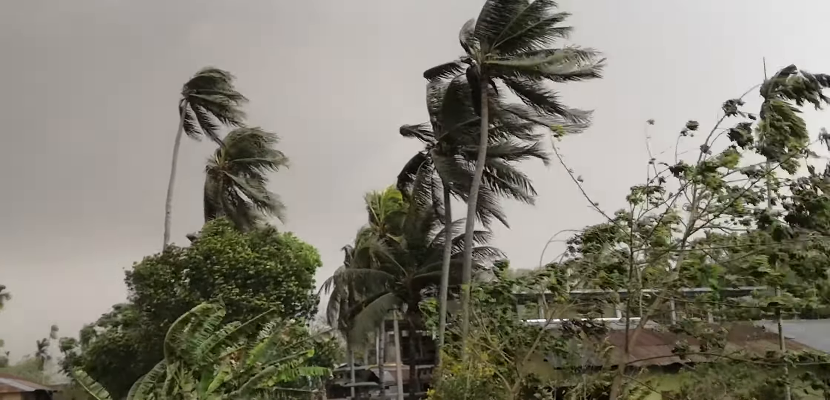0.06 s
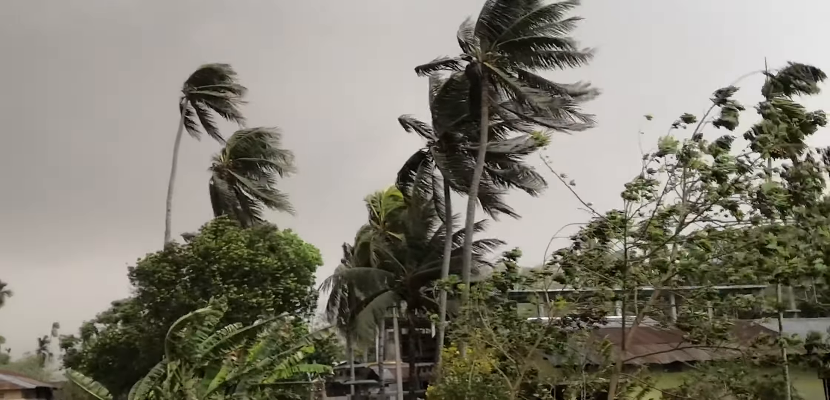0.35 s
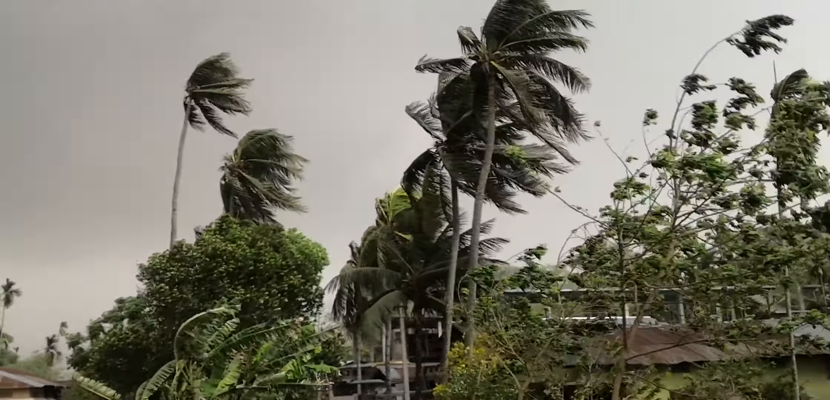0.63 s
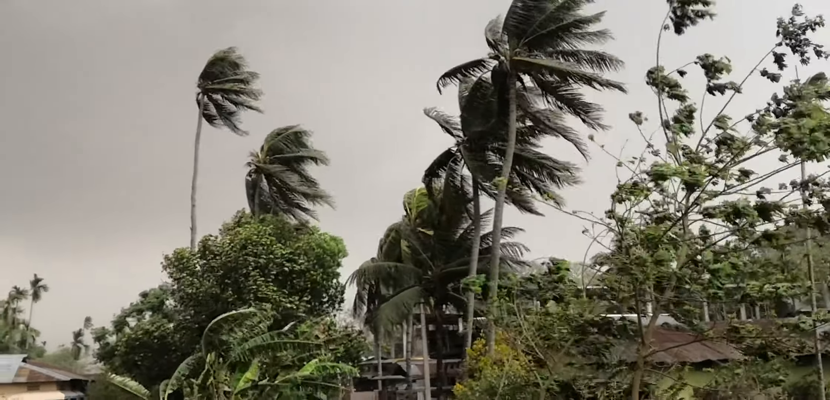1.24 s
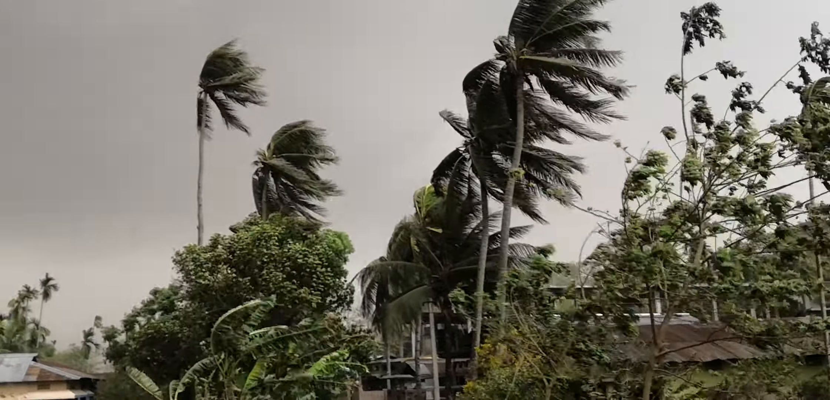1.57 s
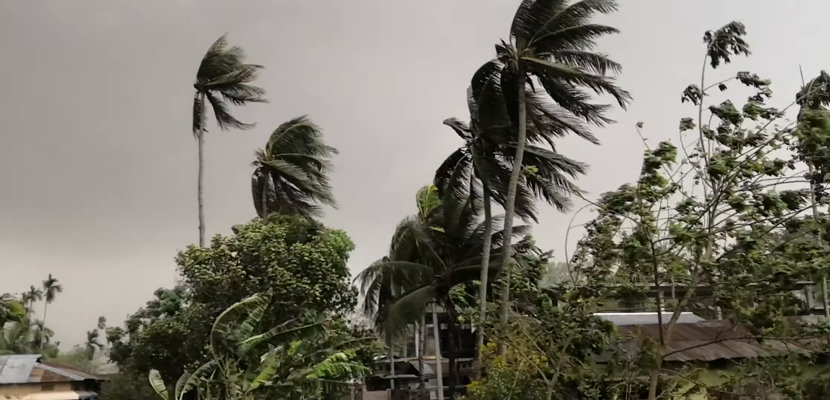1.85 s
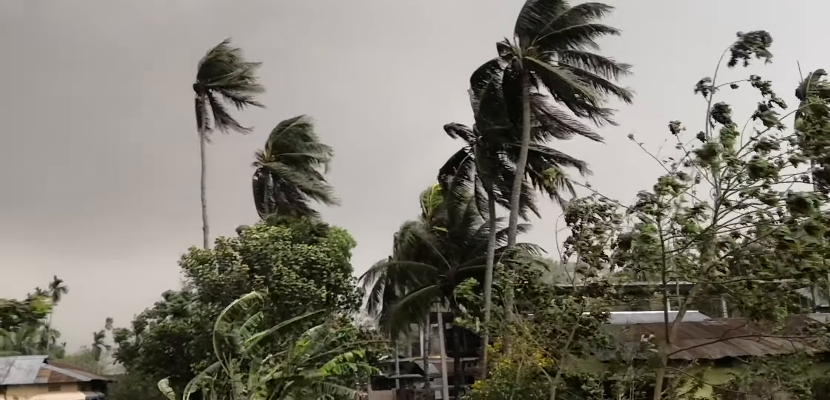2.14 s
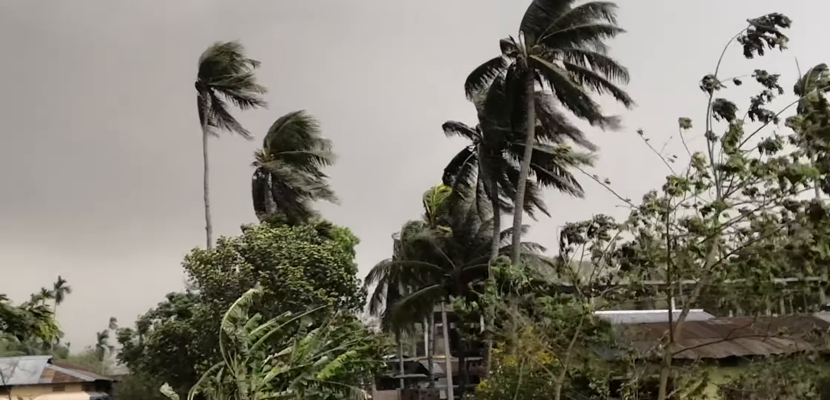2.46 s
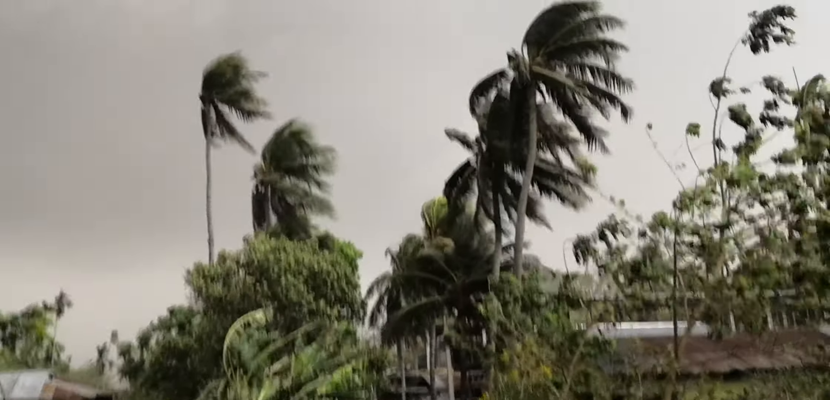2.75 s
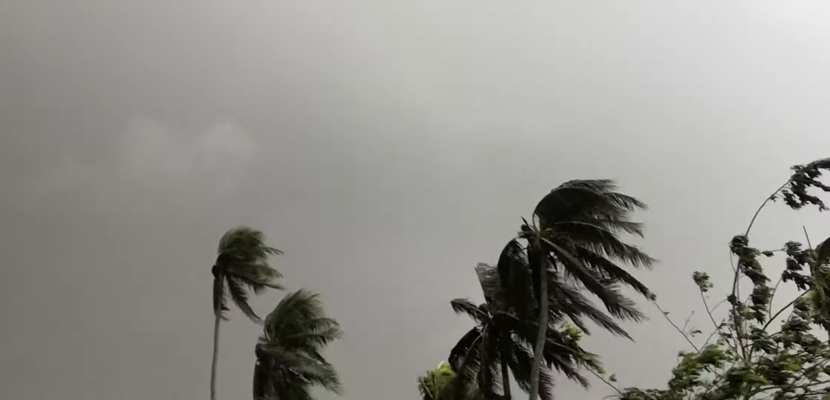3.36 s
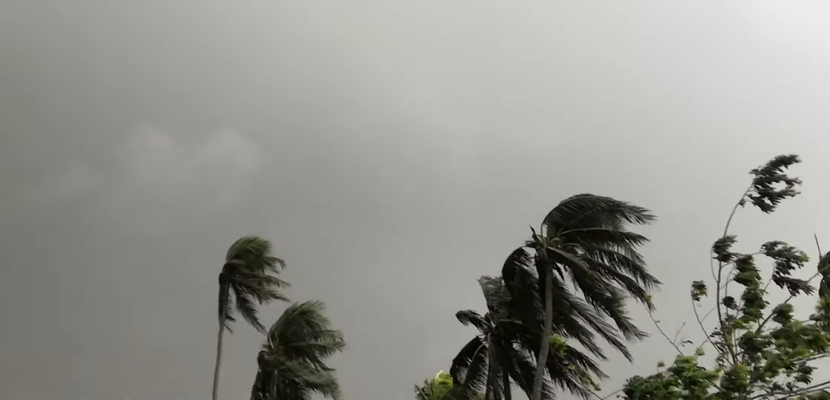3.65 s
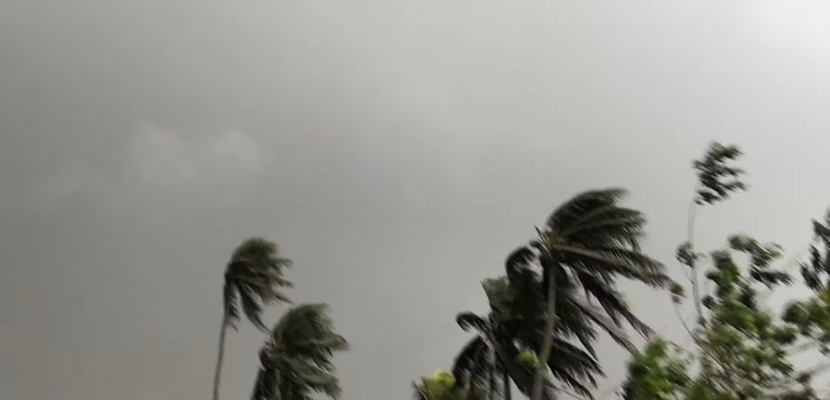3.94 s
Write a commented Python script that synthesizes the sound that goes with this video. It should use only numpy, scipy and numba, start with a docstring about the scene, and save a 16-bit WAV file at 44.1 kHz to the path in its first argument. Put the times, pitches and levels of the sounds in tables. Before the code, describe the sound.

Gusting wind thumps and rumbles on an outdoor microphone, shifting from side to side, while trees rush and near leaves tick faintly. A palm frond swishes once, then loud, ragged blasts strike the microphone.

```python
"""Gale in the trees

Palms and leafy trees give a broad, fluttering rush; near leaves tick and one close frond swishes.
Gusts buffet the microphone, each eddy meeting one port first and the other a moment later;
hard blasts end it. The recorder's gain control ducks the trees under heavy thumps."""
import sys
import numpy as np
from scipy import signal
from scipy.fft import rfft, irfft
from scipy.io import wavfile
from scipy.ndimage import uniform_filter1d, map_coordinates
from numba import njit

SR = 44100
rng = np.random.default_rng(int(sys.argv[2]) if len(sys.argv) > 2 else 0)


def generate_wav(signal):
    """Clip the signal to [-1, 1] and save it as 16-bit WAV at the path in sys.argv[1]."""
    frames = np.transpose(np.atleast_2d(signal))
    scaled = np.clip(frames, -1, 1) * 32767
    pcm = np.round(scaled).astype(np.int16)
    wavfile.write(sys.argv[1], SR, pcm)


N = 176400

# swell of the whole canopy: t/s, level/dB
CANOPY_SWELL = [(0, -1.5), (.13, 1), (.2, -1.5), (.4, 1), (.65, -.5), (.85, 0.5), (1, -0.5), (1.12, -0.5),
                (1.25, -2), (1.5, -1.5), (1.7, -0.8), (2.1, -1), (2.35, 0), (2.6, -3), (2.8, 0), (3, -2),
                (3.3, 0), (3.55, 0.9), (3.75, -1), (4, 1)]


def undb(db):
    """Decibels to gain."""
    return 10 ** (np.asarray(db) / 20)


def curve(rows):
    """Join (t/s, value) rows by straight lines."""
    return np.interp(np.arange(N) / SR, *np.array(rows, float).T)


def at(points, hz):
    """Read (f/Hz, value) points on a log-frequency axis."""
    f, values = np.array(points, float).T
    return np.interp(np.log(np.maximum(hz, 1)), np.log(f), values)


def unit(x):
    """Scale to rms 1."""
    return x / np.sqrt(np.mean(x ** 2))


def colour(x, spectrum):
    """Filter by (f/Hz, level/dB) points, roll off below 10 Hz; rms 1."""
    f = np.fft.rfftfreq(N, 1 / SR)
    low_cut = f ** 2 / (f ** 2 + 10 ** 2)
    return unit(irfft(rfft(x) * undb(at(spectrum, f)) * low_cut, N))


def noise(spectrum, channels=2):
    """Independent coloured noises, rms 1."""
    return colour(rng.standard_normal((channels, N)), spectrum)


def octaves(x, count):
    """Yield (centre/Hz, band) for octave bands that sum to x."""
    centres_hz = 31.25 * 2. ** np.arange(count)
    spectrum, f = rfft(x), np.fft.rfftfreq(N, 1 / SR)
    for hz, pick in zip(centres_hz, np.eye(count)):
        yield hz, irfft(spectrum * at(np.c_[centres_hz, pick], f), N)


def walk(rate_hz):
    """Random steps, smoothed twice; rms 1."""
    hold = max(int(SR / rate_hz), 2)
    steps = rng.standard_normal(4096)[np.arange(N) // hold % 4096]
    return unit(uniform_filter1d(uniform_filter1d(steps, hold), hold))


@njit
def follow(x, rise, fall):
    """One-pole envelope with separate rise and fall coefficients."""
    out, env = np.empty(len(x)), 0.
    for i in range(len(x)):
        env += (x[i] - env) * (rise if x[i] > env else fall)
        out[i] = env
    return out


def buffeting():
    """Turbulence grows louder and brighter with the gust; the windward port gets it first and sharper."""
    # gust strength at the microphone: t/s, level/dB
    gusts = [(0, -30), (.04, -44), (.162, -44), (.18, -24.5), (.27, -16), (.385, -24), (.42, -16.5),
             (.46, -30.5), (.555, -16), (.625, -27.5), (.675, -26), (.71, -15.5), (.76, -19.5),
             (.83, -16.5), (.86, -24.5), (.895, -19.5), (.95, -35), (1.125, -36), (1.15, -27), (1.22, -19),
             (1.265, -28.5), (1.32, -20), (1.39, -22), (1.57, -30), (1.6, -16), (1.64, -28.5), (1.68, -15),
             (1.72, -25), (1.81, -19.5), (1.9, -28), (2.03, -30), (2.08, -32.5), (2.195, -35), (2.22, -22),
             (2.48, -23), (2.53, -24.5), (2.64, -24), (2.72, -15.5), (2.77, -18), (2.95, -22.5),
             (2.99, -23.5), (3.024, -39), (3.036, -17), (3.09, -19.5), (3.33, -23.5), (3.37, -23.5),
             (3.495, -27), (3.53, -38.5), (3.61, -38), (3.63, -26.5), (3.675, -28), (3.7, -20), (3.8, -8),
             (3.86, -10.5), (4, -12.5)]
    # side the wind comes from: t/s, side (+ left, - right)
    windward = [(0, 1), (.51, 1.5), (.55, -0.45), (.64, -4), (.68, 1.2), (.93, 0.5), (1.15, -1.08),
                (2.12, -1.3), (2.2, 0.7), (2.33, 2), (2.38, -1.3), (2.55, 1.04), (2.61, 1), (2.86, -0.1),
                (2.92, -0.2), (2.99, -0.7), (3.03, 0.5), (3.2, 1), (3.26, -1.25), (3.68, -4), (3.75, 1.5),
                (3.83, 0.1), (4, -1.5)]
    # rumble spectrum at the reference gust: f/Hz, level/dB
    rumble = [(15, 1), (30, -5), (60, 1.5), (110, 0), (180, -1.3), (280, -7.5), (450, -16.5), (750, -34.5),
              (1300, -54), (2500, -66), (6000, -100)]
    gust_ref_db, rumble_db, brighten_per_oct = -20, -16.5, 0.2
    puff_db, churn_db, swirl_limit_db = 1.5, 3.5, 4.5
    crossing_s, windward_db, own_share_per_khz = 0.00087, 5, 0.36
    swirl_db = puff_db * walk(rate_hz=28.007) + churn_db * walk(rate_hz=90)
    force_db = curve(gusts) - gust_ref_db + swirl_limit_db * np.tanh(swirl_db / swirl_limit_db)
    lead = np.tanh(6.6 * curve(windward)) * np.array([[.5], [-.5]])  # veers abruptly
    eddy_bands = [band for _, band in octaves(eddies(), count=7)]
    ports = 0
    for (hz, band), hits in zip(octaves(noise(rumble, channels=3), count=7), eddy_bands):
        own_share = np.clip(own_share_per_khz * hz / 1000, 0, 1)  # power not common to both ports
        air = np.sqrt(1 - own_share) * band[2] + np.sqrt(own_share) * band[:2]
        growth = 1 + brighten_per_oct * max(np.log2(hz / 125), 0)
        flow = air * undb(rumble_db + growth * force_db)
        side_db = windward_db * lead * min(hz / 500, 1) ** 2
        ports = ports + (flow + hits) * undb(side_db)
    read_positions = np.arange(N) + lead * crossing_s * SR
    return np.array([map_coordinates(port, [position], order=1, mode="mirror")
                     for port, position in zip(ports, read_positions)])


def eddies():
    """Each eddy is a pressure spike between two troughs, wrapped in a short churning wake."""
    # eddies hitting the ports: t/s, thump level/dB, edge level/dB
    hits = [(0.201, -16.5, -40), (0.2464, -11, -20), (0.254, -7, -15.5), (.285, -21, -16),
            (0.429, -8.5, -20), (0.459, -15.5, -34), (.476, -13, -23), (.497, -12, -33), (0.546, -8, -41),
            (0.692, -22, -47), (0.703, -13, -30), (0.713, -11, -40), (.75, -13.5, -17.5), (.794, -8, -14),
            (0.828, -6.5, -21), (0.892, -15.5, -38), (1.218, -27, -33), (1.321, -13, -19.5),
            (1.33, -12, -17), (1.35, -13.5, -26), (1.402, -16, -31), (1.498, -19, -46), (1.601, -16.5, -43),
            (1.678, -14, -37), (1.77, -17.5, -30), (1.805, -17, -45), (1.823, -19, -23), (2.025, -16, -34),
            (2.222, -22.5, -39), (2.28, -16, -29), (2.33, -22, -44), (2.402, -14.5, -19),
            (2.415, -11.5, -28), (2.482, -12.5, -37), (2.549, -20, -44), (2.68, -6, -9), (2.717, -8, -34),
            (2.744, -12, -22), (2.776, -12.5, -16.5), (2.818, -15, -28), (2.916, -15, -49),
            (2.951, -17.5, -41), (3.042, -17.5, -35), (3.061, -9.5, -17.5), (3.151, -12, -32),
            (3.19, -28, -18.5), (3.25, -21, -42), (3.321, -27, -51), (3.337, -16.5, -36),
            (3.702, -20.5, -25), (3.759, -19, -11.5), (3.799, 4, 0), (3.828, 1.5, -28), (3.854, -2.5, -9),
            (3.901, -11, -11), (3.936, -19, -19)]
    # wake spectrum: f/Hz, level/dB
    wake_spectrum = [(40, -5.5), (130, 1.5), (350, 1.5), (600, -7), (1000, -30), (2000, -34.5), (6000, -91)]
    thump_hz, thump_gain_db, edge_hz, edge_gain_db = 140, 5, 503, 9
    wake_s, wake_gain_db = 0.012, -5.5
    t, spikes, wake = np.arange(N) / SR, np.zeros(N), np.zeros(N)
    for hit_s, thump_db, edge_db in hits:
        near = abs(t - hit_s) < .1
        age_s = t[near] - hit_s
        for hz, db in ((thump_hz, thump_db + thump_gain_db), (edge_hz, edge_db + edge_gain_db)):
            u = (np.pi * hz * age_s) ** 2
            spikes[near] += undb(db) * (1 - 2 * u) * np.exp(-u)  # Ricker pulse
        wake[near] += undb(thump_db + wake_gain_db) * np.exp(-(age_s / wake_s) ** 2)
    return spikes + wake * noise(wake_spectrum, channels=1)[0]


def blasts():
    """The hardest air breaks up raggedly at each port, the stronger the brighter; both share the bass."""
    # blasts tearing at the ports: t/s, half length/s, left level/dB, right level/dB
    bursts = [(3.761, 0.016, -15, -18), (3.797, 0.026, -7, -14), (3.826, 0.016, -3.5, 1),
              (3.853, 0.0076, -11, -11), (3.882, 0.03, -10.5, -8), (3.938, 0.011, -12, -8.5),
              (3.963, 0.016, -10, .5), (4, 0.011, -12, -8)]
    # blast spectrum: f/Hz, level/dB
    spectrum = [(30, -22), (150, 3.5), (400, -6), (800, -6), (1400, -10), (2100, -14.5), (3200, -34),
                (6000, -63), (12000, -91)]
    shared_below_hz, brighten_per_oct, ragged_db = 150, 0.22, 4
    t, out = np.arange(N) / SR, 0
    force = sum(undb([[left_db], [right_db]]) * np.exp(-((t - peak_s) / half_s) ** 2)
                for peak_s, half_s, left_db, right_db in bursts)
    for hz, band in octaves(noise(spectrum), count=8):
        growth = 1 + brighten_per_oct * max(np.log2(hz / 250), 0)
        air = band * force ** growth
        out = out + (air.sum(axis=0) / np.sqrt(2) if hz < shared_below_hz else air)
    return out * unit(undb(ragged_db * walk(rate_hz=300)))


def trees():
    """Countless leaves merge into a rush whose bands sway slowly and flutter on each side."""
    # spectrum of the rush: f/Hz, level/dB
    spectrum = [(30, 2), (150, 2), (300, -1), (600, -4.5), (1000, -2.5), (1400, -2.5), (1900, 3.5),
                (2600, 1.26), (3500, -3.5), (5500, -6), (7500, -10.5), (8500, -17), (10500, -25),
                (14500, -36)]
    # balance, left over right: f/Hz, level/dB
    balance = [(100, 0), (700, -1), (2000, -3), (6000, -6), (8500, -1.5), (14000, 1.5)]
    level_db, sway_db, flutter_db = -35.5, .5, .5
    out = 0
    for hz, band in octaves(noise(spectrum), count=10):
        sway = walk(rate_hz=4.23)
        flutter = np.array([walk(rate_hz=25.53), walk(rate_hz=24.16)])
        side_db = at(balance, hz) * np.array([[.5], [-.5]])
        out = out + band * undb(sway_db * sway + flutter_db * flutter + side_db)
    return out * undb(level_db + curve(CANOPY_SWELL))


def frond():
    """One close frond is whipped round and settles."""
    # swish spectrum: f/Hz, level/dB
    spectrum = [(500, 0), (1200, 1.5), (2800, -0.5), (5000, -9), (9000, -17), (14000, -44)]
    start_s, rise_s, fade_s, level_db = 2.425, 0.017, 0.093, -29.5
    age_s = np.maximum(np.arange(N) / SR - start_s, 0)
    rise = np.minimum(age_s / rise_s, 1)
    fade = np.exp(-np.maximum(age_s - rise_s, 0) / fade_s)
    return undb(level_db) * rise * fade * noise(spectrum)


def leaf_ticks():
    """The nearest leaves flick against each other: a fine sizzle of uneven ticks."""
    # tick spectrum: f/Hz, level/dB
    spectrum = [(500, -27), (2500, -4.5), (5500, 7), (7500, 6), (10000, -11), (14500, -24)]
    ticks_per_s, spread_db, level_db = 500, 6, -54
    struck = rng.random((2, N)) < ticks_per_s / SR
    size = undb(spread_db * np.minimum(rng.exponential(size=(2, N)), 4))
    polarity = rng.choice([-1, 1], (2, N))
    return colour(struck * size * polarity, spectrum) * undb(level_db + curve(CANOPY_SWELL))


def scene():
    """Trees all round, wind on the microphone."""
    return trees() + leaf_ticks() + frond() + buffeting() + blasts()


def record(dry):
    """Stereo-linked gain control, clipping at full scale, low-pass."""
    threshold_db, ratio, top_hz = -10, 3.65, 15000
    attack_s, release_s, lookahead_s = 0.0021, 0.15, 0.0029
    env = follow(np.abs(dry).max(axis=0), 1 / (attack_s * SR), 1 / (release_s * SR))
    gain = np.maximum(env / undb(threshold_db), 1) ** (1 / ratio - 1)
    gain = np.interp(np.arange(N) + lookahead_s * SR, np.arange(N), gain)
    low_pass = signal.ellip(8, .2, 70, top_hz, fs=SR, output="sos")
    return signal.sosfilt(low_pass, np.clip(dry * gain, -1, 1))


dry = scene()
out = record(dry)
generate_wav(out)
```